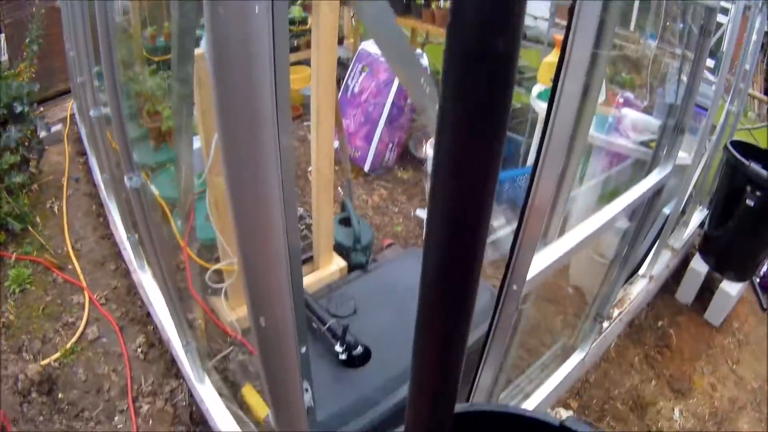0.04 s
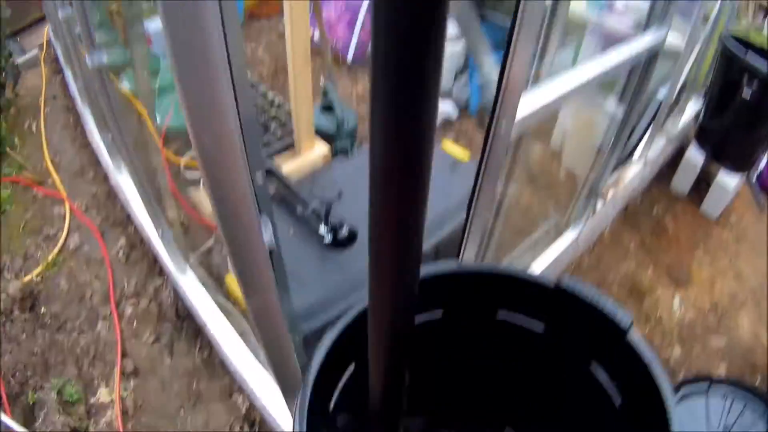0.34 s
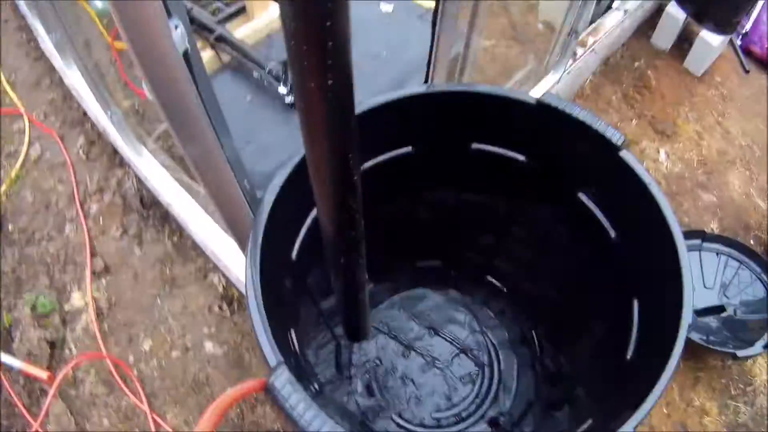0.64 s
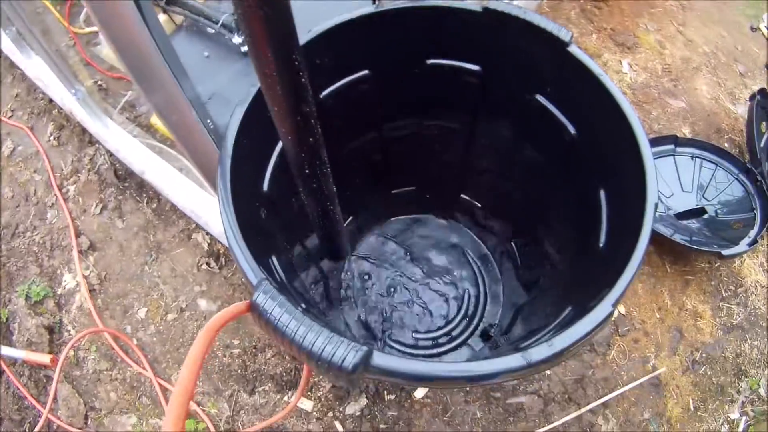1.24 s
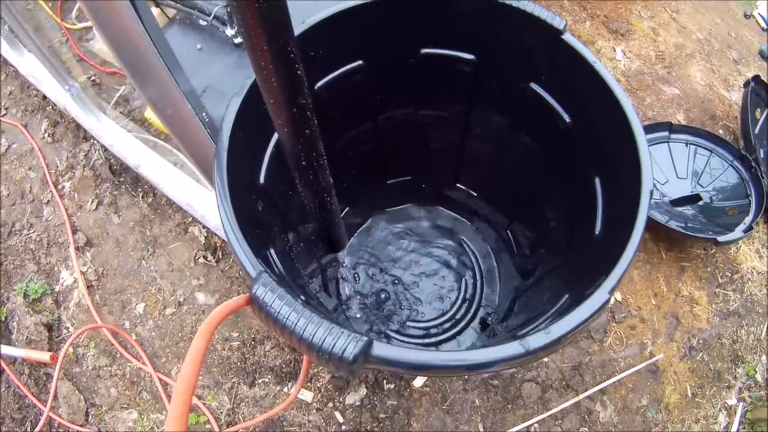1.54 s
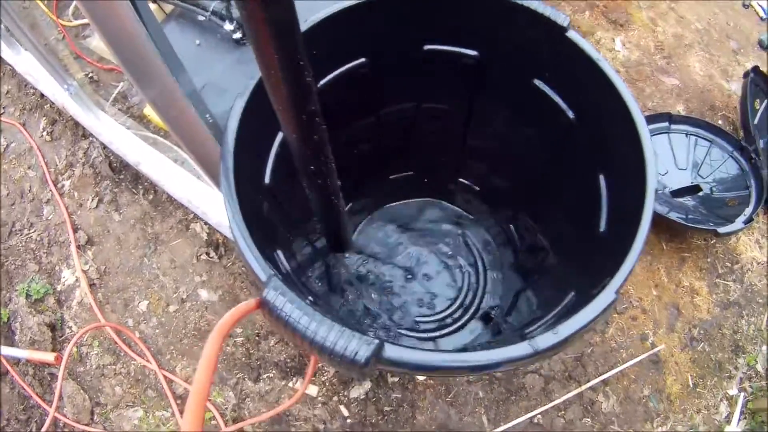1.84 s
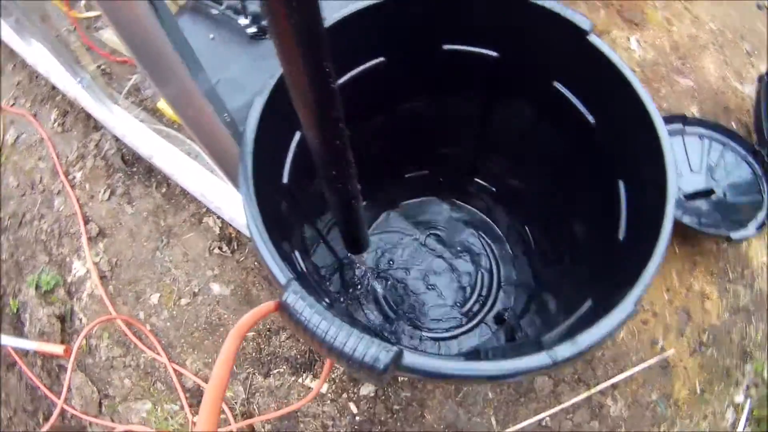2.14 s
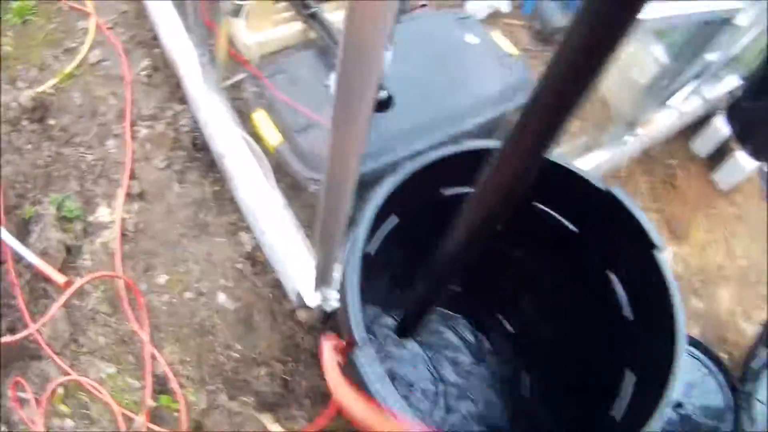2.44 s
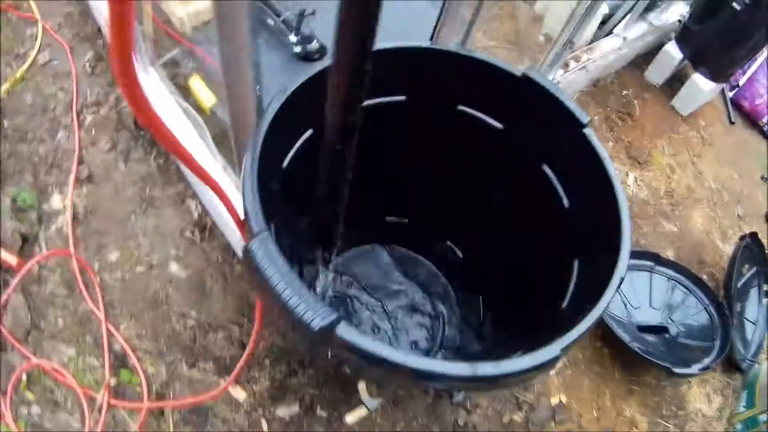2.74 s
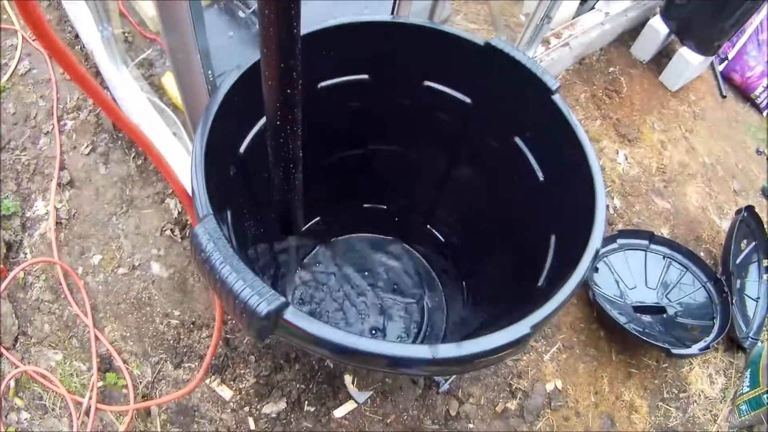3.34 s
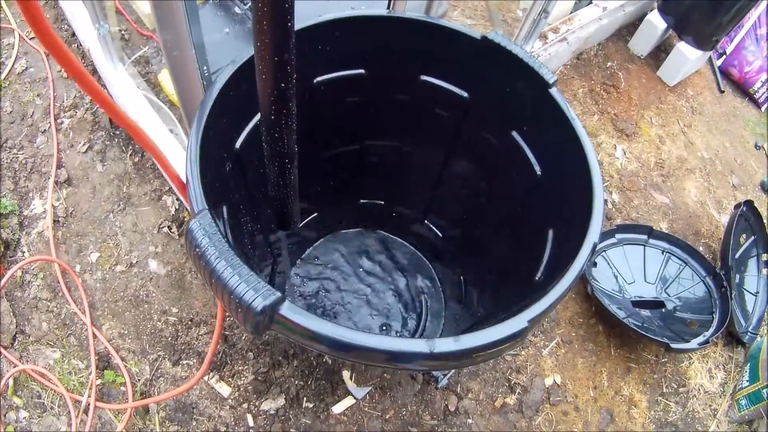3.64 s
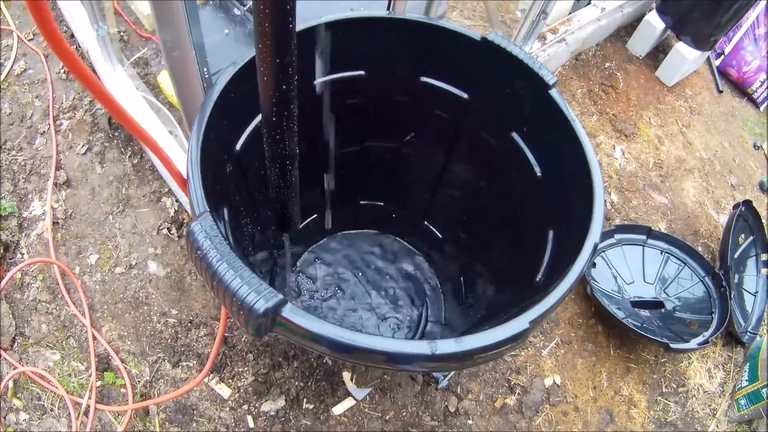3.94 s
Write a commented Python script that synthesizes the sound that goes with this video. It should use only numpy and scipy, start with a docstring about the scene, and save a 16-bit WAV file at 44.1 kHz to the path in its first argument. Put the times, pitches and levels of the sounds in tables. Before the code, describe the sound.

A stream of rainwater splashes unevenly into a plastic bin outdoors, close to a handheld microphone. Bubbles fizz and plop, and heavy drops crack on the plastic. A soft handling bump comes midway, followed by one louder plop.

```python
"""A bright, uneven splashing: rainwater gushes from a downpipe into a plastic bin outdoors.
The stream slaps the shallow water and traps air, and each bubble rings at a pitch set by its size:
tiny ones fizz, larger ones gurgle and plop. Heavy drops crack against the plastic, the air in the bin
booms at its resonances, and the walls reflect the water's sound.
Underneath, the hand that carries the microphone rumbles and bumps once."""
import sys
import numpy as np
from scipy import signal
from scipy.fft import rfft, irfft
from scipy.io import wavfile
from scipy.ndimage import uniform_filter1d

SR = 44100
rng = np.random.default_rng(int(sys.argv[2]) if len(sys.argv) > 2 else 0)


def digitize_waveform(pressure):
    """Quantize a signal to 16-bit integers and store it at the path in sys.argv[1].

    Rows of a 2-D input are taken as channels; values are limited to [-1, 1].
    """
    field = np.atleast_2d(pressure).T
    bounded = np.clip(field, -1, 1)
    quanta = np.round(bounded * 32767).astype(np.int16)
    wavfile.write(sys.argv[1], SR, quanta)


N = 176400


def spray(gush, thinning, gush_db=2.5, flutter_db=0.9):
    """Bubble resonance: the stream breaks up into droplets and tiny bubbles that fizz in clumps."""
    # Strength of the spray. Each row: time in seconds, level in dB.
    strength = [(0,-30.5),(.3,-34.5),(.45,-30),(.7,-32),(.87,-32),(.98,-29.5),(1.2,-30.5),(1.6,-32.5),(1.95,-31),(2.2,-31.5),(2.46,-38),(2.56,-35),(2.75,-34.5),(2.92,-30.5),(3.0,-33),(3.2,-32),(4,-32)]
    # Spectrum of the spray. Each row: frequency in Hz, gain in dB.
    spectrum = [(1500,-13),(2950,-13),(3400,-14.5),(4200,-8),(5400,-5),(7000,0),(8300,-2),(9800,1),(11500,-6.5),(13200,-7.5),(15500,-3)]
    fizz = swarm(2180, 15680, per_s=5000, cycles=4.4, spread_db=4.5, rise=0.021)
    fizz = unit(fizz * amp(gush_db * gush))
    reflected = bin_walls(fizz) * amp(flutter_db * gush)
    return amp(1 + thinning) * level(strength) * unit(colour(reflected, spectrum))


def splashes(rise_s=0.0013, grain_db=3, ping_delay_s=0.0016):
    """Impact and air entrainment: each slap throws a burst of crackle and traps one ringing bubble."""
    # The loudest slaps. Each row: start in seconds, level in dB, bubble pitch in Hz,
    # crackle decay in seconds.
    slaps = [(0.0622,-12.5,8600,0.0023), (0.092,-16,7750,0.0037), (.196,-7,8700,0.0019),
             (0.224,-9,8070,0.00083), (.274,-13,7550,.003), (.351,-17,8300,0.0043), (0.4,-12,7800,0.0024),
             (0.449,-10.5,6200,0.0024), (.457,-13,6540,0.0022), (0.464,-19,6700,.002),
             (.571,-13,7660,0.0034), (.602,-6.5,8720,.005), (0.616,-2.5,9410,0.0033),
             (0.648,-15,8150,0.0016), (.659,-12,7600,0.0018), (0.7079,-11.5,6300,0.01),
             (.764,-8.5,6300,.003), (.777,-12,6500,0.017), (.802,-10,6840,.004), (.826,-5,7650,0.0017),
             (.8998,-14,8580,0.0052), (.926,-14,8400,0.0053), (0.9343,-5.5,10200,0.0048),
             (0.9648,-16,9400,0.0061), (.991,-4.5,7700,.004), (1.0025,-8,8100,0.0041),
             (1.0082,-10,6500,0.013), (1.0704,-10,8370,0.005), (1.0942,-6.5,9800,0.0034),
             (1.163,-12,9050,0.0057), (1.1777,-7,10000,0.0043), (1.192,-20,7950,.002),
             (1.2523,-11.5,10000,.0035), (1.389,-11,9700,0.011), (1.414,-6,8400,0.0057),
             (1.457,-15,7560,0.0025), (1.4665,-7,7100,0.0035), (1.516,-9,6500,0.013),
             (1.5786,-12,6450,0.0033), (1.59,-11,6800,.003), (1.6056,-9,6430,0.0075), (1.619,-13,7100,.003),
             (1.6304,-10,7600,.005), (1.6923,-7.5,6170,0.013), (1.701,-12.5,8600,0.0099),
             (1.744,-8,7040,0.0053), (1.762,-18,8600,0.0033), (1.804,-14,9760,0.0044),
             (1.823,-10.5,7460,0.0078), (1.8756,-4,5400,0.0041), (1.8856,-6,5000,0.0042),
             (1.9032,-9,6900,0.0026), (1.9306,-11.5,7700,0.016), (2.039,-11,8700,.004),
             (2.064,-13,8050,0.0017), (2.088,-21,7500,.003), (2.103,-13,6770,0.0026),
             (2.1992,-10,8700,0.0047), (2.2724,-6.5,8700,0.0072), (2.282,-7.5,9900,0.0042),
             (2.353,-15,7350,0.0029), (2.386,-12.5,9600,0.0065), (2.393,-12.5,9300,0.0083),
             (2.4746,-14,8900,0.0036), (2.492,-8,8980,0.0055), (2.675,-9.5,5960,0.0028),
             (2.833,-10,6800,0.0044), (2.87,-11,6300,0.0055), (2.881,-9,5630,0.0036),
             (2.903,-11,7000,0.0086), (2.9322,-11.5,6650,0.004), (3.085,-12.5,8800,0.019),
             (3.102,-13,9300,0.0077), (3.149,-15,9780,.002), (3.19,-12,8600,.004), (3.205,-13,8000,0.0057),
             (3.214,-14,7240,0.0058), (3.245,-14,9050,0.0028), (3.261,-1,8830,0.0014),
             (3.2851,-13,7100,0.0059), (3.323,-13,9100,0.0034), (3.327,-11,8000,0.0045),
             (3.339,-10,9200,0.002), (3.351,-8.5,7140,0.0071), (3.44,-2.5,5640,0.0046),
             (3.457,-12,7200,0.0075), (3.4925,-14,10200,.003), (3.539,-10.5,7000,0.0061),
             (3.631,-14,6800,0.0046), (3.7,-9.5,9400,0.0041), (3.734,-9.5,7100,0.002),
             (3.787,-14,8550,0.0035), (3.8735,-5,8800,0.0038), (3.939,-8,7700,0.0038),
             (3.992,-13,8650,0.0027)]
    # Spectrum of the slaps. Each row: frequency in Hz, gain in dB.
    spectrum = [(500,-13),(2200,-13),(2950,-18.5),(3400,-8.5),(4200,-12),(5400,0),(7000,2.5),(9800,3),(11500,-2.5),(13200,-10),(15500,-4)]
    out, t = np.zeros(N), np.arange(SR // 20) / SR
    for start, db, hz, decay_s in slaps:
        noise, grain = rng.standard_normal((2, len(t)))
        grain = unit(uniform_filter1d(grain, size=24))
        crackle = unit(noise * amp(grain_db * grain))
        envelope = (1 - np.exp(-t / rise_s)) ** 2 * np.exp(-(t / max(decay_s, 0.001)) ** 2)
        slap = amp(-10) * crackle * envelope / envelope.max()
        add(slap, ping_delay_s, amp(3.5) * bubble(hz, cycles=4.3, rise=0.0085, swell=0.78))
        add(out, start, amp(db) * signal.fftconvolve(slap, bin_echo(early_db=-2, tail_db=-11)))
    return colour(out, spectrum)


def churn(gush, thinning, drum_db=2, gurgle_db=4, dip_share=0.89):
    """A plunging jet entrains air: it drums on the shallow water and folds in bubbles that gurgle."""
    # Strength of the drumming and of the gurgling. Each row: time in seconds, level in dB.
    drum_level = [(0,-45),(.14,-49.5),(.65,-42.5),(.79,-56),(.91,-43.5),(1.93,-49),(2.05,-41.5),(2.4,-45.5),(2.44,-39),(2.51,-49),(4,-47)]
    gurgle_level = [(0.0, -46.5), (1.02, -38), (1.18, -42), (1.4, -39), (1.89, -42.5), (2.47, -40.5),
                    (2.63, -49), (2.67, -36.5), (2.73, -42.5), (2.93, -39), (3.0, -41), (3.02, -31),
                    (3.04, -39), (4.0, -40.5)]
    # Their spectra. Each row: frequency in Hz, gain in dB.
    drum_spectrum = [(120,-14),(180,-5),(230,-2.5),(330,1.5),(410,-7.5),(520,2.5),(620,2.5),(780,0.5),(1000,-7),(1600,-3),(2400,-12),(2950,-30),(3500,-19),(5000,-34)]
    gurgle_spectrum = [(500,-20),(900,-2),(1300,6.5),(1720,-1),(2000,0.5),(2500,-4.5),(2950,-44),(3500,-18),(5000,-33)]
    drum = swarm(148, 5000, per_s=1200, cycles=1.56, spread_db=1, rise=0.045) * amp(drum_db * gush)
    gurgle = swarm(775, 2556, per_s=900, cycles=3, spread_db=3.5, rise=0.012) * amp(gurgle_db * gush)
    drum = unit(colour(hollow(bin_walls(drum)), drum_spectrum))
    gurgle = unit(colour(hollow(bin_walls(gurgle)), gurgle_spectrum))
    churning = amp(-0.5) * level(drum_level) * drum + amp(-2) * level(gurgle_level) * gurgle
    return churning * amp(dip_share * thinning)


def plops(echo_db=-4, echo_s=0.003555):
    """Resonant pitch falls as radius grows: single large bubbles plop well below the fizz."""
    # Large bubbles. Each row: start in seconds, level in dB, pitch in Hz.
    large_bubbles = [(.095,-25,770),(.71,-19.5,1380),(0.736,-17,1795),(0.958,-19.5,1200),(1.028,-18.5,1510),(1.382,-19,1210),
                     (1.447,-17.5,2140),(1.691,-21.5,1560),(2.092,-22.5,1170),(2.202,-17.5,1420),(2.432,-17.5,1740),(2.46,-18,2020),
                     (2.677,-18,1200),(2.699,-23,1290),(2.831,-23,1250),(2.909,-16.5,1940),(3.014,-4,2110),(3.095,-21.5,1970),
                     (3.123,-18.5,1270),(3.208,-21.5,1260),(3.288,-19.5,1380),(3.461,-17.5,1260),(3.606,-18,1190),(3.731,-21,1250),(3.927,-20.5,1390)]
    out = np.zeros(N)
    for start, db, hz in large_bubbles:
        ring = amp(db - 1.5) * bubble(hz, cycles=2.44, rise=0.025, swell=0.14)
        add(out, start, ring)
        add(out, start + echo_s, amp(echo_db) * signal.fftconvolve(ring, bin_echo()))
    return hollow(out)


def sizzle(gush, thinning, gush_db=2):
    """Superposed impacts: the ticks of the finest droplets on water and walls merge into a sizzle."""
    # Strength of the sizzle. Each row: time in seconds, level in dB.
    strength = [(0,-60),(.6,-56),(1,-35.5),(1.5,-62),(2,-54),(2.45,-36),(2.6,-73),(2.9,-51),(3.1,-38),(3.5,-34),(4,-35.5)]
    # Spectrum of the sizzle. Each row: frequency in Hz, gain in dB.
    spectrum = [(5900,-6.5),(7100,12.5),(7600,-7),(8700,9),(10000,8),(12000,3),(13200,0),(15500,9)]
    ticks = swarm(6500, 16000, per_s=5000, cycles=2, spread_db=3.2, rise=0)
    reflected = bin_walls(ticks * amp(gush_db * gush))
    return amp(4 + thinning) * level(strength) * unit(colour(reflected, spectrum))


def cracks(decay_s=0.0035):
    """A brief impact has a broad spectrum: heavy drops crack on the plastic through the thin water."""
    # Hard drops. Each row: start in seconds, level in dB.
    drops = [(.25,-27),(0.41,-25.5),(0.826,-26.5),(0.938,-21),(1.005,-18.5),(1.413,-24),(1.747,-20),(2.333,-28.5),(2.356,-25.5),(2.393,-25),(2.401,-24.5),(2.433,-32),(2.802,-29),(2.907,-25),(2.932,-22.5),(3.012,-24.5)]
    # Spectrum of the impacts. Each row: frequency in Hz, gain in dB.
    spectrum = [(200,-30),(600,-23),(1000,2),(2200,2.5),(3600,7),(5000,7),(9000,-5),(16000,-15)]
    out, t = np.zeros(N), np.arange(SR // 50) / SR
    for start, db in drops:
        hit = amp(db - 0.5) * rng.standard_normal(len(t)) * np.exp(-t / decay_s)
        add(out, start, signal.fftconvolve(hit, bin_echo()))
    return hollow(colour(out, spectrum))


def boom(gush, thinning, gush_db=3):
    """Cavity resonance: the stream keeps the bin's air ringing, and slugs of water make it swell."""
    # Deep and upper air modes. Each row: frequency in Hz, level in dB, time to fall 60 dB in seconds.
    deep_modes = [(112.4,-2,0.29),(129.9,3.5,0.31),(166,-2,.1)]
    upper_modes = [(310,-9,0.15),(341,-5.5,.1),(536,-1,0.068),(606,4,0.071),(641,4,0.045)]
    # Their strength; the upper modes vary as the microphone moves over the rim.
    # Each row: time in seconds, level in dB.
    deep_level = [(0,-53),(.24,-59),(.3,-59),(.5,-48.5),(4,-46)]
    upper_level = [(0,-69),(.4,-66),(.55,-44),(.85,-60),(1.1,-45.5),(1.5,-54.5),(2.05,-48.5),(2.45,-52),(2.62,-56.5),(3.2,-71),(4,-54)]
    # Slugs that thud on the bottom. Each row: start in seconds, deep level in dB, upper level in dB.
    slugs = [(0.09,-35.5,-33),(.27,-39.5,-47),(0.497,-34.5,-32.5),(0.542,-45,-32.5),(0.651,-36,-30.5),(0.971,-42,-36),(1.084,-37,-31),
             (1.2,-38,-57),(1.31,-40,-36),(1.41,-39,-37.5),(1.63,-46,-33.5),(1.669,-38,-39),(1.877,-32.5,-60),(1.95,-33.5,-43),
             (2.046,-46,-33),(2.09,-44,-31.5),(2.426,-42,-31),(2.466,-53,-34),(2.666,-33,-39.5),(2.873,-37,-54),
             (3.02,-37,-36),(3.075,-37,-50),(3.481,-38,-43),(3.672,-37,-46),(3.75,-40,-48),(3.943,-33,-39.5)]
    deep = signal.oaconvolve(rng.standard_normal(N), ringing(deep_modes))[:N]
    uneven_drive = rng.standard_normal(N) * amp(gush_db * gush + thinning)
    upper = signal.oaconvolve(uneven_drive, ringing(upper_modes))[:N]
    out = level(deep_level) * unit(deep) + level(upper_level) * unit(upper)
    for start, deep_db, upper_db in slugs:
        add(out, start, amp(deep_db) * ringing(deep_modes, vary_db=2))
        add(out, start, amp(upper_db) * ringing(upper_modes, vary_db=4))
    return out


def handling():
    """Structure-borne sound: the hand passes a low rumble and a soft knock into the microphone."""
    # Rumble of the moving hand. Each row: time in seconds, level in dB.
    strength = [(0,-67),(.35,-70),(.7,-61),(1.9,-69),(2.15,-51),(2.34,-47),(2.5,-57),(2.7,-71),(4,-61)]
    # The pulses of one knock. Each row: start in seconds, level in dB, pitch in Hz.
    pulses = [(2.307,-42,109),(2.322,-17.5,217),(2.357,-27,95)]
    # Spectrum of the rumble. Each row: frequency in Hz, gain in dB.
    spectrum = [(15, -12), (45, 4), (80, 2), (250, -15), (600, -20), (3000, -82)]
    out = level(strength) * unit(colour(rng.standard_normal(N), spectrum))
    for start, db, hz in pulses:
        add(out, start, amp(db) * bubble(hz, cycles=0.54, rise=0))  # damped so hard that it thuds
    return out


def bubble(hz, cycles, rise, swell=0.009):
    """Damped oscillator, `cycles` periods per decay time; pitch climbs as a bubble nears the surface."""
    age = np.arange(0, 7, hz / cycles / SR)  # in decay times, as is swell
    envelope = (1 - np.exp(-age / swell)) * np.exp(-age)
    return envelope * np.sin(2 * np.pi * cycles * (age + rise * age ** 2 / 2))


def swarm(low_hz, high_hz, per_s, cycles, spread_db, rise, sizes=40):
    """Shot noise: bubbles of many sizes are born at random moments, a few much stronger than the rest."""
    out = np.zeros(N)
    births = int(per_s * N / SR / sizes)
    for hz in np.linspace(low_hz, high_hz, sizes):
        moment, chance, polarity = rng.random((3, N // 100))[:, :births]
        strength = np.sign(polarity - 0.5) * amp(spread_db * np.minimum(-np.log(chance), 4))
        impulses = np.bincount((moment * N).astype(int), strength, N)
        ring = bubble(hz, cycles, rise) * np.sqrt(hz)  # equal energy at every size
        out += signal.oaconvolve(impulses, ring)[:N]
    return unit(out)


def ringing(modes, vary_db=0):
    """Modal superposition: decaying sines, peak 1, whose mix varies with the spot that is struck."""
    t = np.arange(SR // 2) / SR
    ring = np.zeros(len(t))
    for k, (hz, db, t60) in enumerate(modes):
        envelope = amp(db + vary_db * rng.standard_normal() - 60 * t / t60)
        ring += (-1) ** k * envelope * np.sin(2 * np.pi * hz * t)
    return ring / abs(ring).max()


def bin_echo(early_db=-0.5, tail_db=-3.5, early_s=0.0033):
    """Impulse response of the bin at one spot: direct sound, quick reflections, a short reverberation."""
    # Ring of the bin's walls. Each row: frequency in Hz, time to fall 60 dB in seconds.
    decay_times = [(200,0.11),(1500,0.07),(6000,0.099),(15000,0.011)]
    t = np.arange(SR // 10) / SR
    early, tail = rng.standard_normal((2, len(t)))
    early *= (t > 0.0004) * np.exp(-t / early_s)
    tail *= 1 - np.exp(-t / 0.003)
    hz, frame_s, bands = signal.stft(tail, SR, nperseg=128)
    bands *= amp(-60 * frame_s / read(decay_times, hz)[:, None])
    tail = signal.istft(bands, SR)[1][:len(t)]
    echo = (t == 0) + amp(early_db) * early / np.linalg.norm(early)
    echo += amp(tail_db) * tail / np.linalg.norm(tail)
    return echo / np.linalg.norm(echo)


def bin_walls(x, spots=8, hold_samples=256):
    """Reflection paths depend on position: drops land now here, now there, each spot with its echo."""
    landing = np.repeat(rng.integers(0, spots, N // hold_samples + 1), hold_samples)[:N]
    out = np.zeros(N)
    for spot in range(spots):
        share = uniform_filter1d(1.0 * (landing == spot), size=96)
        out += signal.oaconvolve(x * share, bin_echo())[:N]
    return out


def hollow(x):
    """Standing waves above the water colour its sound in narrow bands."""
    # Resonances of the bin. Each row: frequency in Hz, width in Hz, gain in dB.
    resonances = [(326,29,-1),(541,7.5,3.5),(611,10,5.5),(770,18,5),(1238,25,2.5),(1560,97,3),(1954,18,6.5),(2660,220,3.5)]
    return x + sum(band_change(x, hz, width_hz, db) for hz, width_hz, db in resonances)


def band_change(x, hz, width_hz, db):
    """Interference: the signal that, added to x, raises or lowers one band by db."""
    return (amp(db) - 1) * signal.lfilter(*signal.iirpeak(hz, hz / width_hz, SR), x)


def colour(x, points, size=4096):
    """Minimum-phase filter with the given (Hz, dB) shape."""
    log_gain = np.log(amp(read(points, abs(np.fft.fftfreq(size, 1 / SR)))))
    taps = np.fft.ifft(np.exp(np.conj(signal.hilbert(log_gain)))).real
    return signal.oaconvolve(x, taps[:size // 2])[:N]


def wander(low_hz, high_hz):
    """Band-limited noise: random unsteadiness between two rates, rms 1."""
    hz = np.fft.rfftfreq(N, 1 / SR)
    band = hz / (hz + low_hz) / (1 + (hz / high_hz) ** 2)
    return unit(irfft(rfft(rng.standard_normal(N)) * band, N))


def amp(db):
    """Decibels to gain."""
    return 10 ** (np.asarray(db) / 20)


def unit(x):
    """Scales to rms 1."""
    return x / np.sqrt(np.mean(x ** 2) + 1e-20)


def level(points):
    """Interpolates a (seconds, dB) curve to a gain for every sample."""
    return amp(np.interp(np.arange(N) / SR, *np.transpose(points)))


def read(points, hz):
    """Interpolates a table on a log-frequency axis."""
    table_hz, value = np.transpose(points)
    return np.interp(np.log(hz + 1), np.log(table_hz + 1), value)


def add(mix, start, sound):
    """Superposes a sound on the mix from a start in seconds."""
    part = mix[max(round(start * SR), 0):][:len(sound)]
    part += sound[:len(part)]


def scene():
    """Common modulation: one uneven stream drives spray, churning and boom, and now and then thins."""
    # Moments when the stream thins. Each row: centre in seconds, half-length in seconds, dip in dB.
    breaks = [(0.049,0.0098,-3.5),(0.21,0.019,-3.5),(0.23,0.011,-5),(0.316,0.0089,-3),(0.565,0.009,-6),(0.82,0.015,-1),(1.059,0.02,-8),(1.133,0.021,-6.5),
              (1.684,.0057,-6),(1.798,0.0074,-7.5),(2.037,0.0063,-9),(2.261,0.0062,-10),(2.553,0.0072,-4),(2.622,0.012,-5),(2.663,.014,-7.5),
              (2.892,0.0048,-3),(2.98,.037,-1.5),(3.307,0.0074,-6.5),(3.524,0.0078,-2.5),(3.59,.012,-4),(3.795,0.013,-4.5)]
    t = np.arange(N) / SR
    gush = np.clip(wander(low_hz=33.2, high_hz=53.7), -2.5, 1.6)
    thinning = sum(db * np.exp(-((t - centre) / half) ** 4) for centre, half, db in breaks)
    water = spray(gush, thinning) + sizzle(gush, thinning) + splashes() + cracks()
    water += churn(gush, thinning) + plops()
    water += band_change(water, hz=2924, width_hz=266, db=-14)  # reflections cancel a narrow band
    return (water + boom(gush, thinning) + handling())[None]


def record(dry, cutoff_hz=15850):
    """Band limiting: a steep low-pass filter removes the highest treble."""
    taps = signal.firwin(511, cutoff_hz, window=("kaiser", 9), fs=SR)
    return signal.oaconvolve(dry, taps[None], "same")


dry = scene()
out = record(dry)
digitize_waveform(out)
```